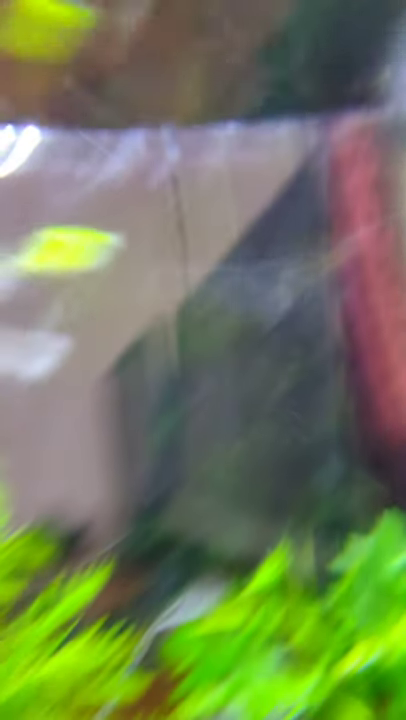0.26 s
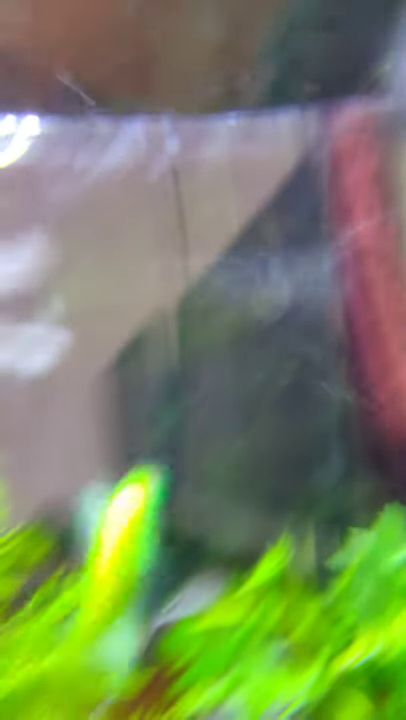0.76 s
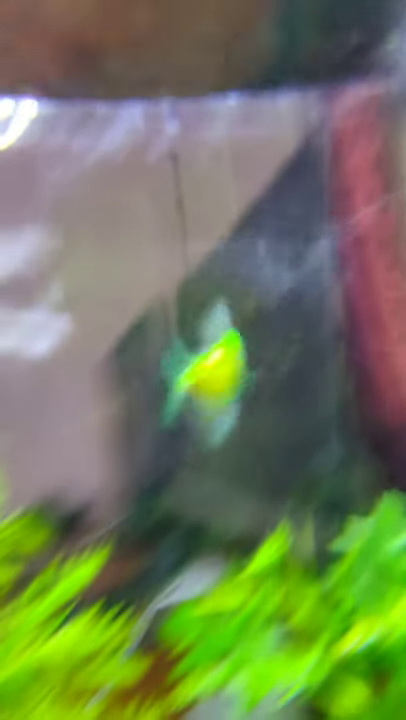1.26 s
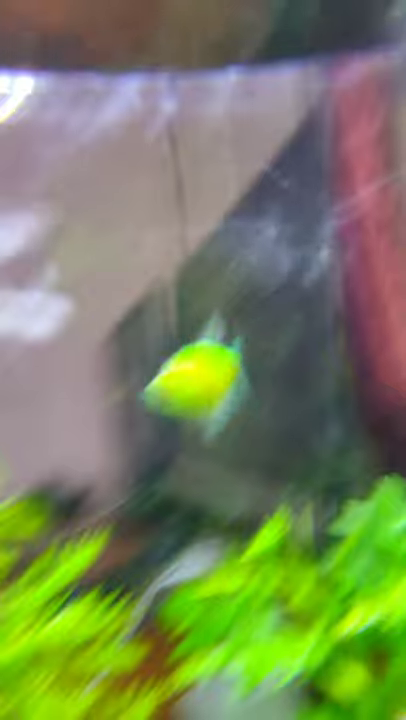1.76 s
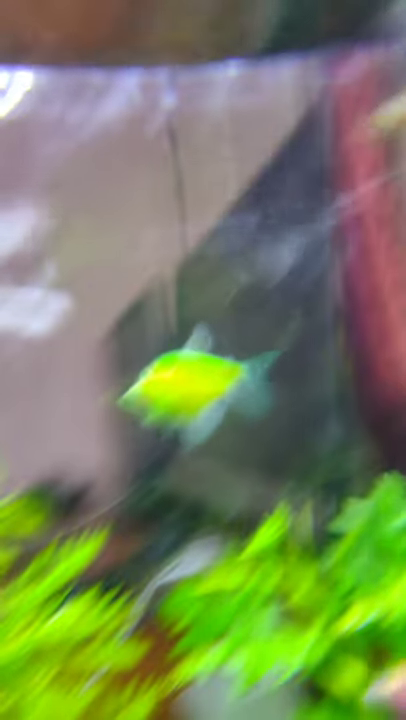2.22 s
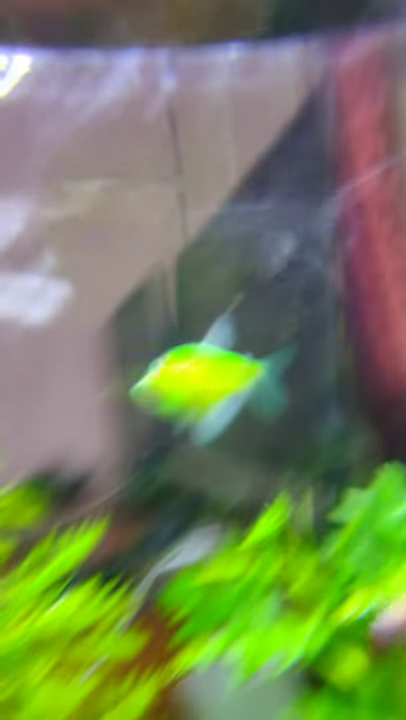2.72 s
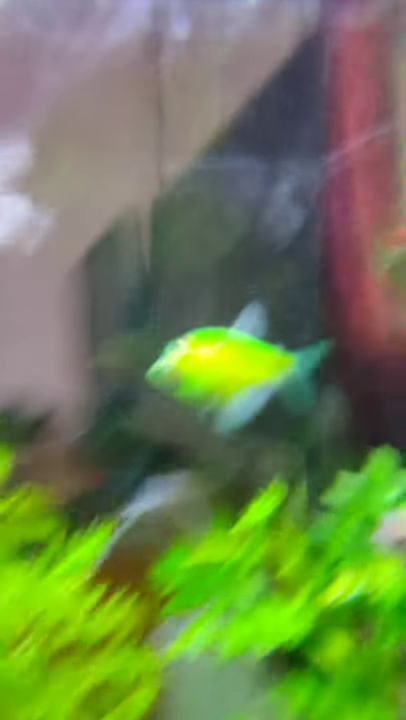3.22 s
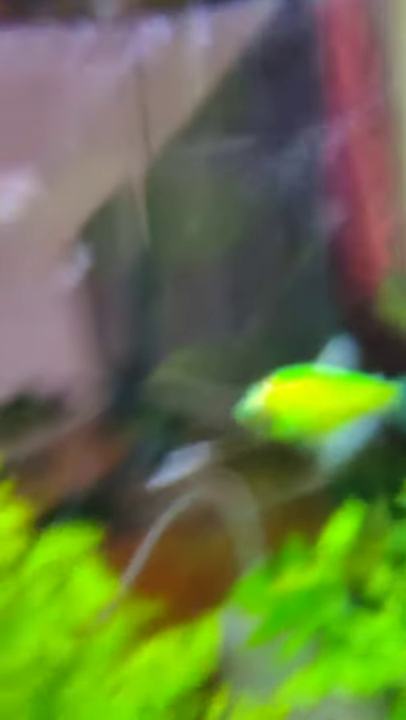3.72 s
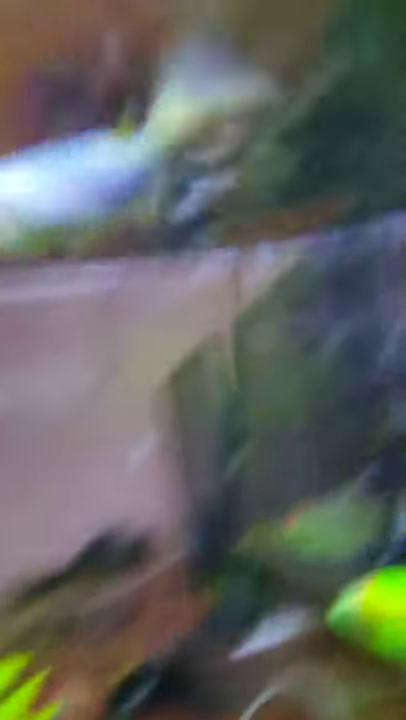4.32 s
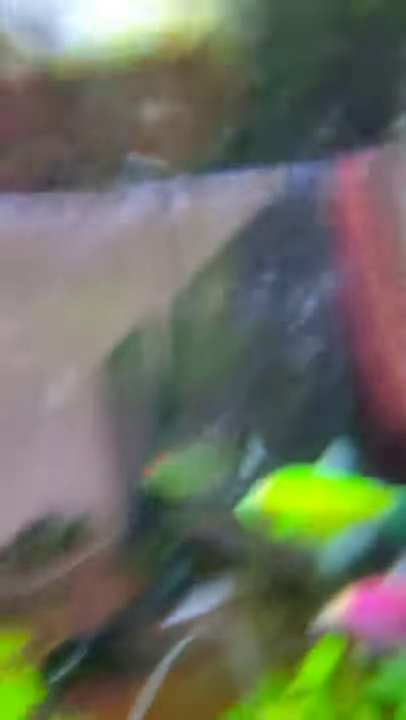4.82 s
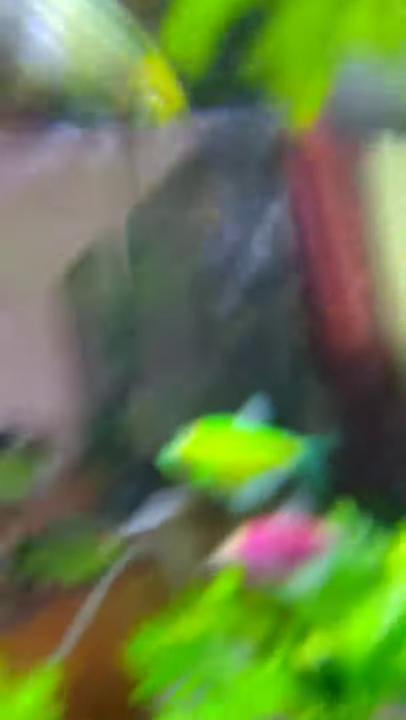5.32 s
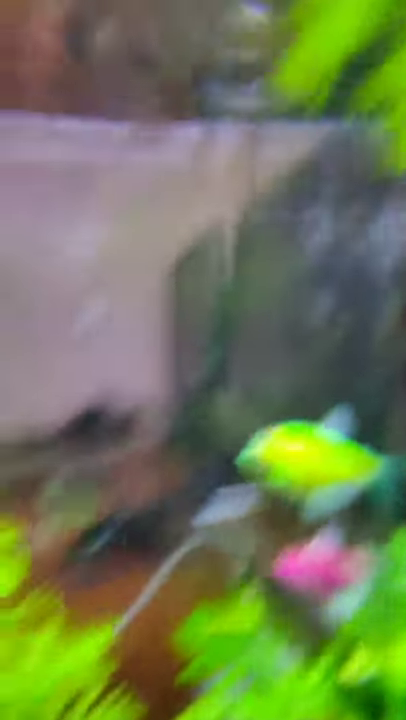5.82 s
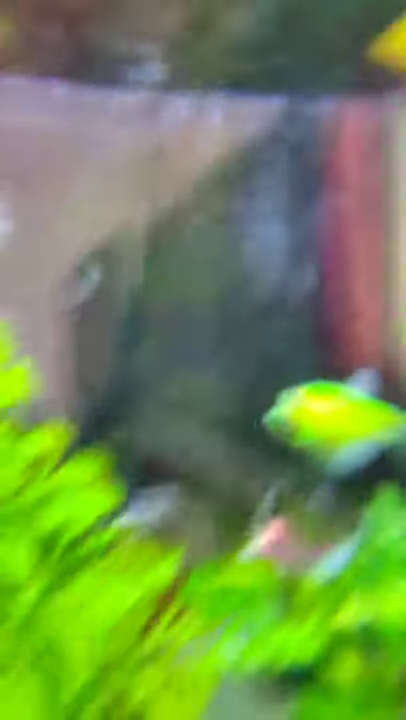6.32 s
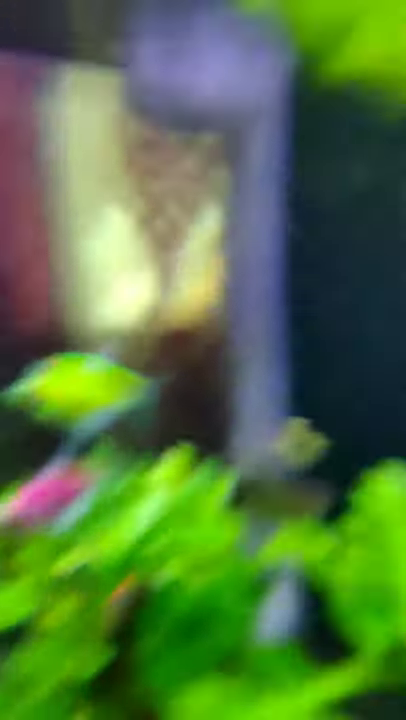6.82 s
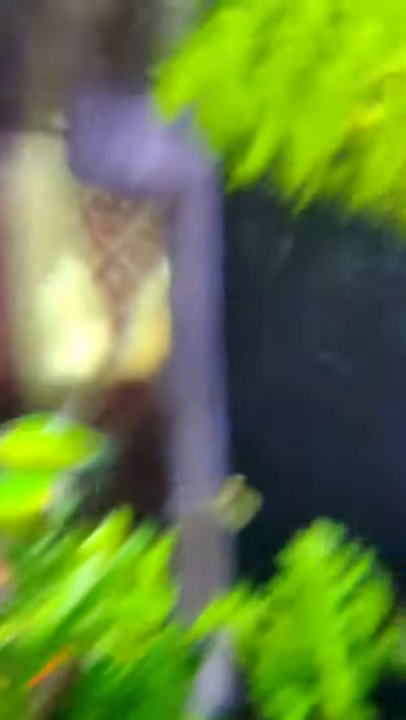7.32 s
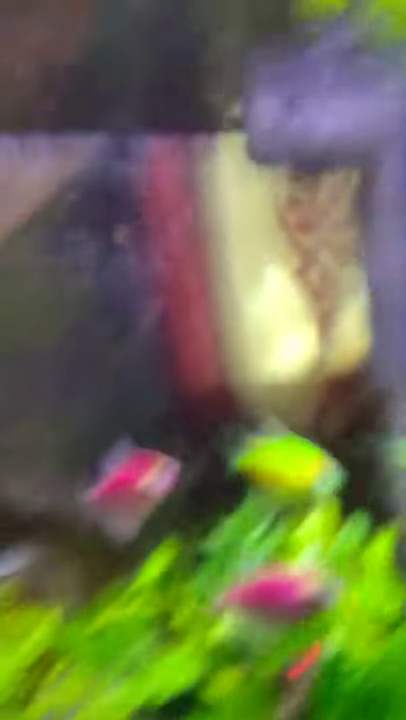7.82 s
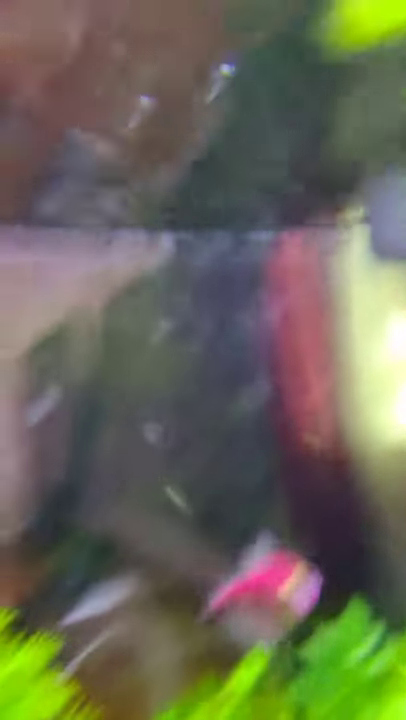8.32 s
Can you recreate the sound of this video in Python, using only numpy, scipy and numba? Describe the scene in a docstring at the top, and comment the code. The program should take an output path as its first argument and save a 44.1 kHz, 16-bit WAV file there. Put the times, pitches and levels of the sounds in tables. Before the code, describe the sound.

Heard from inside an aquarium, water gurgles and bloops dully while a pump hums low and occasional knocks bump the microphone.

```python
"""A muffled, churning bubbling, heard under water in a home fish tank, with single bloops standing out.
Every bubble is a short ring that rises in pitch; together they ring the glass box. Water thumps the
microphone, whose housing dulls the bubbling, and the hardest thumps duck the gain. An air pump hums on
the mains, tiny bubbles ping, and dry clicks sit mostly on the loudest bloops and thumps. A thin hiss
of spray and a low rush lie behind it all."""
import sys
import numpy as np
from scipy import signal
from scipy.fft import rfft, irfft, next_fast_len
from scipy.io import wavfile
from scipy.ndimage import uniform_filter1d, minimum_filter1d
from numba import njit

SR = 44100
rng = np.random.default_rng(int(sys.argv[2]) if len(sys.argv) > 2 else 0)


def transcribe(signal):
    """Save signal, clipped to [-1, 1], as a 16-bit WAV file at the path in sys.argv[1]."""
    frames = np.atleast_2d(signal).T
    limited = np.clip(frames, -1, 1)
    pcm = np.round(limited * 32767).astype(np.int16)
    wavfile.write(sys.argv[1], SR, pcm)


N = 377496

# swells of the bubble cloud: t/s, large bubbles level/dB, middle level/dB, tiny level/dB
CLOUD_SWELLS = [(0, -27.5, -41, -45), (.2, -40, -46, -49), (.6, -36.5, -30, -46), (.8, -36.5, -38.5, -50),
                (1.1, -34, -33.5, -52.5), (1.65, -32, -30, -43.5), (2.0, -29, -32, -54),
                (2.25, -44, -35, -53), (2.75, -31.5, -36.5, -47.5), (3.4, -33.5, -34.5, -46.5),
                (4.1, -28, -32, -49), (4.5, -30.5, -32, -46.5), (4.9, -31.5, -43, -49.5),
                (5.45, -27, -23.5, -57), (5.65, -40.5, -33.5, -74), (5.7, -36, -36, -50.5),
                (6.15, -29.5, -24, -57.5), (6.5, -31.5, -31, -45.5), (6.7, -43, -36, -60),
                (6.83, -50, -41, -66), (6.88, -27.5, -26.5, -42.5), (7.35, -32.5, -34, -48),
                (7.8, -28, -32, -42.5), (8.56, -30.5, -33, -49.5)]
# deep gurgle of the largest bubbles: t/s, level/dB
GURGLE_SWELLS = [(0, -42), (.2, -34), (.5, -20), (.78, -20), (.95, -35.5), (1.3, -34), (1.95, -34),
                 (2.2, -38.5), (2.6, -27.5), (3.6, -28), (4.1, -18.5), (4.7, -17.5), (4.95, -27),
                 (5.4, -22), (5.6, -31.5), (5.8, -22), (6.1, -31.5), (6.5, -30.5), (6.82, -40),
                 (6.9, -31.5), (7.3, -35.5), (7.65, -20.5), (7.95, -31), (8.56, -21)]
# bubbles that stand out: t/s, level/dB, f/Hz, t60/s (capped when played)
SINGLE_BUBBLES = [(0.045, -17.5, 866, 0.053), (0.044, -10.5, 1583, 0.023), (0.09, -8.5, 870, 0.018),
                  (0.348, -21.5, 1860, 0.046), (0.439, -15.5, 1430, 0.029), (0.467, -3, 1917, 0.019),
                  (0.509, -3.5, 1260, 0.02), (0.565, -10, 1176, 0.043), (0.575, -9.5, 1574, 0.024),
                  (0.642, -7.5, 1120, 0.026), (0.722, -16.5, 870, 0.033), (0.909, -16.5, 1350, 0.045),
                  (0.954, -8, 944, 0.023), (0.954, -23.5, 2005, 0.045), (0.996, -11.5, 850, 0.031),
                  (1.016, -1, 805, 0.023), (1.041, -3.5, 866, 0.025), (1.045, -17, 1695, .04),
                  (1.098, -13, 752, 0.056), (1.159, -17.5, 715, 0.065), (1.237, -12.5, 897, 0.035),
                  (1.235, -21.5, 2016, 0.036), (1.301, -12, 793, 0.073), (1.333, -11, 735, 0.071),
                  (1.377, -15, 854, 0.048), (1.481, -9, 1097, 0.025), (1.634, -7, 404, 0.017),
                  (1.648, -19, 2140, 0.042), (1.654, -12, 884, 0.022), (1.742, -11.5, 720, 0.055),
                  (1.778, -21.5, 2000, 0.034), (1.78, -13.5, 924, 0.029), (1.92, -12.5, 822, 0.051),
                  (1.961, -13, 746, 0.072), (2.048, -11, 2000, 0.031), (2.069, -10.5, 1400, 0.052),
                  (2.068, -16, 2120, 0.055), (2.068, -12, 862, 0.067), (2.2, -21, 830, 0.029),
                  (2.2345, -23.5, 2110, 0.033), (2.236, -16, 754, 0.068), (2.303, -9.5, 796, 0.054),
                  (2.328, -22, 1350, 0.027), (2.348, -13, 802, 0.041), (2.362, -11, 860, 0.025),
                  (2.417, -19, 2130, 0.031), (2.473, -13.5, 1056, 0.059), (2.492, -14.5, 887, 0.047),
                  (2.533, -19.5, 2085, 0.028), (2.575, -16, 1554, 0.047), (2.605, -24, 2020, 0.022),
                  (2.868, -13, 1567, 0.052), (2.949, -12, 1165, 0.033), (2.995, -20.5, 2070, 0.033),
                  (3.216, -20.5, 2100, 0.03), (3.313, -7, 2463, 0.032), (3.413, -10.5, 1350, 0.036),
                  (3.536, -22.5, 1970, 0.034), (3.568, -13.5, 874, 0.052), (3.668, -10.5, 1330, 0.041),
                  (3.856, -7.5, 1525, 0.047), (3.97, -14.5, 1650, 0.037), (4.391, -10, 1303, 0.039),
                  (4.427, -1.5, 1150, 0.028), (4.526, -11, 1133, 0.051), (4.598, -18, 963, 0.14),
                  (4.616, -5.5, 1230, 0.024), (4.742, -14, 1555, 0.032), (4.79, -9, 1130, 0.023),
                  (4.835, -8, 1120, 0.039), (4.854, -9, 983, 0.1), (4.949, -1.5, 1070, 0.05),
                  (5.009, -20.5, 1696, 0.083), (5.092, -11.5, 1190, 0.029), (5.146, -18.5, 800, 0.066),
                  (5.244, -14.5, 1238, 0.04), (5.399, -11, 850, 0.022), (5.416, -7, 800, 0.037),
                  (5.429, -10, 900, 0.032), (5.68, -27, 2530, 0.036), (5.785, -22, 1376, 0.061),
                  (5.924, -15, 777, 0.094), (6.016, -13.5, 893, 0.038), (6.059, -10.5, 846, 0.069),
                  (6.119, -11, 920, 0.03), (6.12, -24, 1950, 0.034), (6.188, -7, 758, 0.1),
                  (6.248, -16, 854, 0.043), (6.253, -24.5, 1930, 0.033), (6.547, -10.5, 690, 0.032),
                  (6.848, -8.5, 1260, 0.057), (6.848, -17, 1890, 0.057), (6.873, -15.5, 983, 0.056),
                  (6.927, -4.5, 1336, 0.033), (6.984, -10, 720, 0.057), (7.012, -9, 1570, 0.026),
                  (7.072, -7, 1314, 0.036), (7.212, -4.5, 962, 0.05), (7.241, -15, 2054, 0.035),
                  (7.251, -13.5, 1697, 0.042), (7.33, -21, 1970, .04), (7.547, -11, 1210, 0.044),
                  (7.62, -18.5, 1970, 0.046), (7.649, -15, 415, 0.063), (7.672, -15.5, 1690, 0.038),
                  (7.723, -15, 1510, 0.057), (7.85, -11, 1083, 0.061), (7.997, -13.5, 2120, 0.022),
                  (7.997, -5.5, 1670, 0.013), (8.019, -2, 1315, 0.041), (8.034, -2, 1358, 0.057),
                  (8.054, -2, 1250, 0.028), (8.086, -13.5, 1174, 0.071), (8.175, -17, 1257, 0.09),
                  (8.435, -3, 1240, 0.036), (8.466, -11, 1181, 0.066), (8.527, -11.5, 1243, 0.057)]
# swells of the finest spray: t/s, level/dB
SPRAY_SWELLS = [(0.1, -70), (1.9, -67.5), (2.39, -72), (2.76, -66), (3.26, -65.5), (3.65, -73), (4.45, -69),
                (4.62, -69.5), (5.48, -71.5), (5.62, -77), (5.7, -66.5), (5.92, -66.5), (6.25, -73),
                (6.91, -70.5), (7.05, -63.5), (7.35, -75), (7.75, -66.5), (8.5, -73.5)]


def undb(db):
    """Decibels to amplitude."""
    return 10 ** (np.asarray(db) / 20)


def at_rms(x, db):
    """Set a signal's RMS level."""
    return x * undb(db) / np.sqrt(np.mean(x ** 2))


def curve(times, values):
    """An envelope of straight lines through timed points."""
    return np.interp(np.arange(N) / SR, times, values)


def wander(rate_hz):
    """Smooth random drift with a spread near 1: random steps, slewed into each other."""
    hold = int(SR / rate_hz)
    steps = np.repeat(rng.standard_normal(N // hold + 1), hold)
    return 1.46 * uniform_filter1d(steps, hold)[:N]


def equalize(x, gain_at):
    """Filter by a gain given as a function of frequency."""
    size = next_fast_len(N)
    hz = np.arange(size // 2 + 1) * SR / size + 1e-3
    return irfft(rfft(x, size) * gain_at(hz), size)[:N]


def noise_tail(length_s, t60):
    """A dense echo: noise that dies away."""
    t = np.arange(int(length_s * SR)) / SR
    return rng.standard_normal(len(t)) * np.exp(-np.log(1000) * t / t60)


@njit
def add_ring(out, start, hz, t60, amp, glide, rise_s):
    """Add one damped sine; its pitch slides by the fraction `glide` as it fades."""
    first, length = int(start * SR), int(t60 * SR) + 2
    fade, ease = np.exp(-np.log(1000) / length), np.exp(-1 / (rise_s * SR))
    held_back, phase = 1., 0.
    for i in range(min(length, N - first)):
        phase += 2 * np.pi * hz * (1 + glide * i / length) / SR
        amp *= fade
        held_back *= ease
        out[first + i] += amp * (1 - held_back) * np.sin(phase)


def rings(starts, hz, t60, db, glide, rise_s):
    """A track of damped sines; each setting is one for all or one per ring."""
    out = np.zeros(N)
    for event in np.broadcast(starts, hz, t60, undb(db), glide):
        add_ring(out, *event, rise_s)
    return out


def bubble_cloud():
    """Five sizes of bubble, each a shower of rising rings, mostly quiet, a few loud; all surge together."""
    # one row per size (largest, large, middle, small, tiny): lowest f/Hz, highest f/Hz
    pitch_ranges = [(140, 330), (350, 670), (680, 1040), (1050, 1760), (1800, 2700)]
    # per size: bubbles/s, cycles to fall 20 dB on average, level scatter/dB
    showers = [(150, 8, 2.5), (350, 9, 2.2), (300, 11, 2.3), (400, 12, 2.4), (500, 12, 2.8)]
    # per size: trim/dB
    trims = [-7.5, 0, -1.5, 1, -0.5]
    # swells of the small bubbles: t/s, level/dB
    small_swells = [(0, -36.5), (.8, -42.5), (1.6, -35), (2.3, -43), (3.2, -38), (4.2, -34), (5.0, -35),
                    (5.6, -41), (6.4, -38.5), (6.82, -40.5), (6.9, -29.5), (7.5, -36.5), (8.56, -34)]
    times, large_db, middle_db, tiny_db = np.transpose(CLOUD_SWELLS)
    swells = [curve(*np.transpose(GURGLE_SWELLS)), curve(times, large_db), curve(times, middle_db),
              curve(*np.transpose(small_swells)), curve(times, tiny_db)]
    surge_db = 2.66 * wander(18)
    out = np.zeros(N)
    for (low, high), (rate, cycles, scatter_db), db, trim_db in zip(pitch_ranges, showers, swells, trims):
        when, pitch, faintness, life = rng.random((int(rate * N / SR), 4)).T
        hz = low * (high / low) ** pitch
        t60 = 3 * cycles * (.5 + life) / hz
        bubble_db = -scatter_db * np.log(faintness + 1e-4)
        shower = rings(when * N / SR, hz, t60, bubble_db, glide=.17 * life, rise_s=.00088)
        gain = np.sqrt(undb(db + trim_db) ** 2 + swarm_power(low, high))
        out += at_rms(shower, 0) * gain * undb(surge_db + wander(14))
    return out


def swarm_power(low_hz, high_hz):
    """Each single bubble brings a swarm of its own size: power that swells and fades around it."""
    width_s, swarm_db = .15, -32
    starts, db, hz, _ = np.transpose(SINGLE_BUBBLES)
    t = np.arange(0, N / SR, .01)
    in_range = (hz >= low_hz) & (hz < high_hz)
    power = undb(np.minimum(db, -8) + swarm_db) ** 2 * in_range
    swells = np.exp(-(2 * (t - starts[:, None]) / width_s) ** 2)
    return curve(t, power @ swells)


def single_bubbles():
    """Each bubble slaps the water as it breaks off, rings, and sheds a faint smaller neighbour."""
    starts, db, hz, t60 = np.transpose(SINGLE_BUBBLES)
    t60 = np.clip(t60, .008, .12)
    bend, step, lag = rng.random((len(starts), 3)).T
    bloops = rings(starts, hz, t60, db, glide=.045 * bend, rise_s=.0008)
    shed_hz = hz * 2 ** (.2 + .55 * step)
    shed = rings(starts + .006 * lag, shed_hz, .7 * t60, db - 17, glide=.042 * bend, rise_s=.0003)
    slaps = rings(starts, 1.2 * hz, t60=.004, db=db - 4, glide=0, rise_s=.0002)
    return bloops + shed + slaps


def glass_tank(x):
    """A short dense echo smears every bubble; standing waves between the panes lift some pitches."""
    # standing waves: f/Hz, width/Hz, lift/dB
    modes = [(265.2, 41, 8.5), (488, 25, 3.5), (861.7, 20, 7), (1208.4, 36, 6.5), (1390, 23, 3),
             (1617, 53, 4), (2095, 54, 3.5)]
    echo = noise_tail(length_s=.3, t60=.11)
    echo /= np.sqrt(np.sum(echo ** 2))
    wet = undb(-7.5) * signal.fftconvolve(x, echo)[:N]

    def resonance(f):
        return 1 + sum((undb(db) - 1) / (1 + 2j * (f - hz) / width) for hz, width, db in modes)
    return equalize(x + wet, resonance)


def water_thumps():
    """Water knocks on the microphone: short, low pressure pulses that fall in pitch."""
    # knocks: t/s, level/dB, f/Hz, t60/s (the shortest is stretched below)
    knocks = [(0.593, -14.5, 211, 0.066), (0.729, -14, 210, 0.097), (1.273, -8.5, 231, 0.069),
              (2.068, -5, 510, 0.024), (3.741, 0, 188, 0.043), (3.783, 15, 203, 0.01),
              (3.919, -6.5, 168, 0.051), (4.273, 14, 166, 0.036), (4.445, -4.5, 210, 0.037),
              (5.82, -3.5, 131, 0.08), (6.603, 16, 340, 0.006), (7.798, 16, 430, 0.0031)]
    starts, db, hz, t60 = np.transpose(knocks)
    return rings(starts, hz, np.clip(t60, .004, .3), db, glide=-.2, rise_s=.0004)


def air_pump():
    """A hum at twice mains, weaker multiples that flutter, and an octave that swells with the gurgle."""
    # weaker overtones: multiple of mains, level/dB relative to the hum
    overtones = [(5, -14), (6, -14), (7, -20), (8, -19)]
    # slow drift of the hum: t/s, level/dB
    drift = [(0, -22), (1.8, -22.5), (2.3, -25.5), (3.6, -23), (5.9, -23), (6.2, -26), (6.55, -22),
             (6.78, -27), (6.95, -23), (7.6, -22.5), (8.56, -24)]
    mains_hz = 50
    mains_phase = 2 * np.pi * mains_hz * np.arange(N) / SR
    hum = np.sin(2 * mains_phase + .088 * wander(8))
    for multiple, db in overtones:
        flutter = undb(db + 4 * wander(12))
        hum += flutter * np.sin(multiple * mains_phase + rng.uniform(0, 2 * np.pi) + .8 * wander(12))
    waver = undb(.49 * wander(18))
    octave = waver * np.sin(4 * mains_phase + rng.uniform(0, 2 * np.pi) + .5 * wander(8.1))
    octave_db = -32 + 1.3 * (curve(*np.transpose(GURGLE_SWELLS)) + 25)
    hum_db = curve(*np.transpose(drift)) + 2.1 * wander(11)
    return np.sqrt(2) * (hum * undb(hum_db) + octave * undb(octave_db))


def pings():
    """Tiny bubbles ping: a wet tick, a high ring, and a softer, lower droplet that splits off."""
    # pinging bubbles: t/s, level/dB, f/Hz
    hits = [(0.5305, -48, 4340), (0.5754, -43.5, 3617.0), (0.9562, -49, 6960), (4.3593, -46, 6800),
            (4.435, -46.5, 5470), (4.497, -41.5, 3230), (4.8914, -51, 6870), (5.088, -33, 3200),
            (5.125, -44, 3370), (5.372, -49.5, 3800), (5.8214, -42, 3000), (6.9515, -45.5, 4950),
            (7.1118, -37.5, 3200), (7.4002, -50, 5800), (8.245, -44, 7200), (8.3003, -41, 4250)]
    starts, db, hz = np.transpose(hits)
    t60 = .018
    step, lag = rng.random((len(starts), 2)).T
    ticks = rings(starts, hz, t60=.0025, db=db, glide=0, rise_s=.00005)
    tones = rings(starts, hz, t60, db, glide=.063, rise_s=.00015)
    droplets = rings(starts + .005 * lag, hz * (.72 + .15 * step), t60, db - 5, glide=.08, rise_s=.0003)
    return ticks + tones + droplets


def dry_clicks():
    """Dry, sharp clicks, mostly on the loudest bloops and thumps."""
    # clicks: t/s, level/dB
    clicks = [(0.4688, -31), (0.5114, -36), (0.6441, -34), (1.043, -33), (1.238, -39), (2.069, -14),
              (2.12, -38), (2.304, -38), (2.3647, -34.5), (3.254, -40), (3.281, -38), (3.315, -33),
              (3.35, -39), (3.3648, -31), (3.376, -37), (3.6722, -35.5), (4.5265, -32), (4.6185, -33),
              (4.792, -34), (4.954, -32), (5.4298, -32), (5.5113, -34.5), (6.605, -13), (6.6184, -23),
              (7.074, -32), (7.785, -31.5), (7.999, -28.5), (8.024, -25.5), (8.0574, -28), (8.4371, -32)]
    starts, db = np.transpose(clicks)
    return rings(starts, hz=3750, t60=.0017, db=db, glide=0, rise_s=.00005)


def fizz():
    """A random scatter of faint ticks and short pings, a little louder when the spray swells."""
    when, pitch, faintness, life = rng.random((900, 4)).T
    starts = when * N / SR
    t60 = .0006 + .03 * life ** 4
    swell_db = .4 * (np.interp(starts, *np.transpose(SPRAY_SWELLS)) + 73)
    db = -54 - 3.5 * np.log(faintness + 1e-3) + swell_db
    db -= 18 * life + 5 * pitch  # longer and higher rings are softer
    return rings(starts, 2700 * 2.6 ** pitch, t60, db, glide=.1 * life, rise_s=.0001)


def treble_ticks():
    """Pings, clicks and fizz together, with a very short tail and the lows cut."""
    ticks = pings() + dry_clicks() + fizz()
    ticks += .04 * signal.fftconvolve(ticks, noise_tail(length_s=.03, t60=.015))[:N]
    return signal.sosfilt(signal.butter(2, 1700, "high", fs=SR, output="sos"), ticks)


def spray():
    """The finest spray: a thin flickering hiss, strongest near 3 kHz."""
    hiss = equalize(rng.standard_normal(N), lambda f: (f / 2800) ** 8 / (1 + (f / 2900) ** 11.8))
    flicker_db = 1.5 * wander(90) + 2.2 * wander(14)
    return at_rms(hiss, 0) * undb(curve(*np.transpose(SPRAY_SWELLS)) + flicker_db)


def far_water():
    """The low rush of far water; it sinks and rises with the large bubbles."""
    # tone colour of the rush: f/Hz, relative level/dB
    spectrum = [(20, -5), (40, -16.5), (75, 3), (130, 6.5), (300, -13), (1000, -17), (2000, -46.5),
                (3000, -57), (8500, -72.5)]
    hz, db = np.transpose(spectrum)
    rush = equalize(rng.standard_normal(N), lambda f: undb(np.interp(np.log(f), np.log(hz), db)))
    large_db = curve(*np.transpose(CLOUD_SWELLS)[:2])
    swell_db = 2.7 * wander(7.1) + .34 * (large_db - large_db.mean())
    return at_rms(rush, -33.5) * undb(swell_db)


def scene():
    """Mono mix: muffled bubbles and thumps in front, then pump, ticks, spray and far water."""
    water = glass_tank(bubble_cloud() + single_bubbles()) + water_thumps()
    # the housing around the microphone takes the treble away, its capsule the deepest bass
    water = signal.sosfilt(signal.butter(6, 2198, fs=SR, output="sos"), water)
    water = signal.sosfilt(signal.butter(3, 95, "high", fs=SR, output="sos"), water)
    return (water + air_pump() + treble_ticks() + spray() + far_water())[None]


def record(dry):
    """Hard thumps duck the gain, which climbs back; a fast limiter holds other peaks; the top is cut."""
    threshold_db, recover_db_per_s, ceiling, top_hz = -4.5, 62.5, .54, 7800
    peak = -minimum_filter1d(-np.abs(dry), size=int(.008 * SR)) + 1e-9
    over_db = np.maximum(20 * np.log10(peak) - threshold_db, 0)
    climb_db = recover_db_per_s * np.arange(N) / SR
    duck = undb(climb_db - np.maximum.accumulate(over_db + climb_db, axis=1))
    gain = uniform_filter1d(np.minimum(duck, ceiling / peak), size=int(.006 * SR))
    return signal.sosfilt(signal.ellip(8, .2, 60, top_hz, fs=SR, output="sos"), gain * dry)


dry = scene()
out = record(dry)
transcribe(out)
```